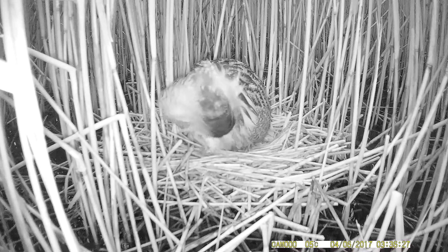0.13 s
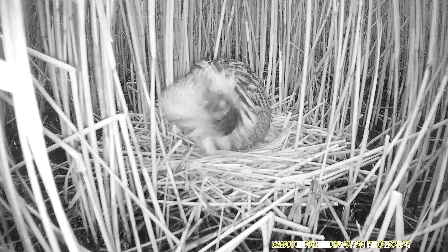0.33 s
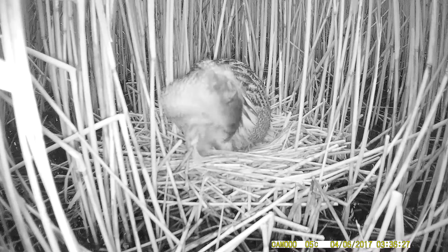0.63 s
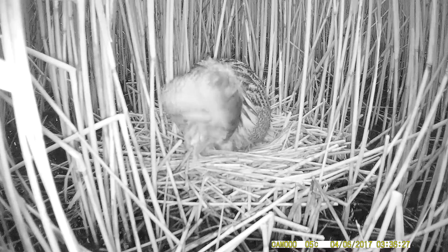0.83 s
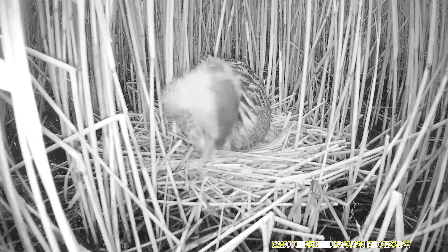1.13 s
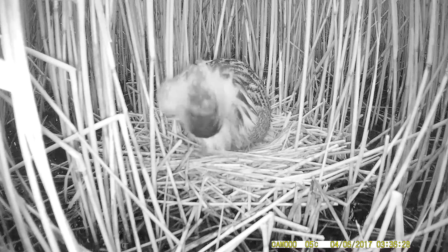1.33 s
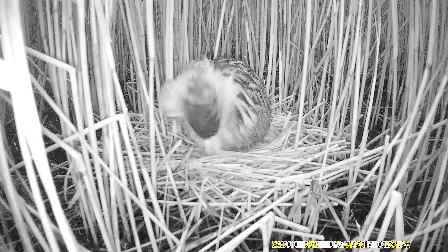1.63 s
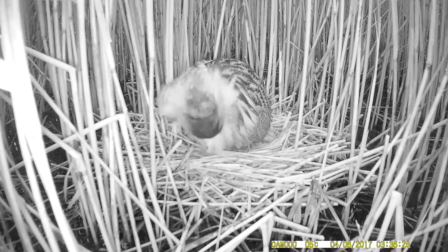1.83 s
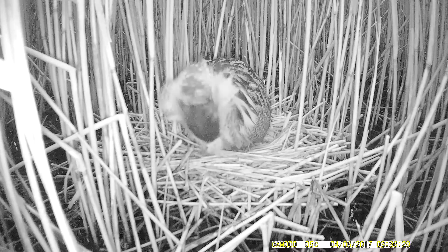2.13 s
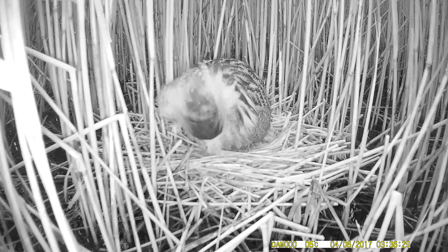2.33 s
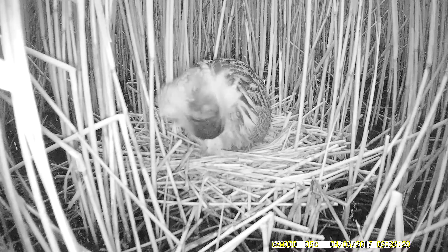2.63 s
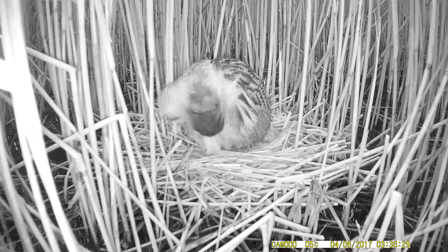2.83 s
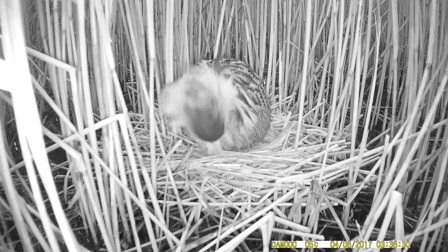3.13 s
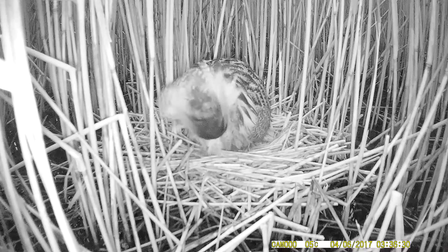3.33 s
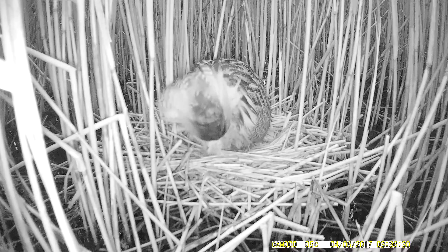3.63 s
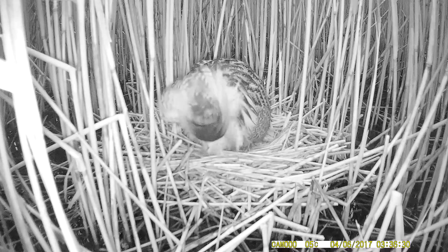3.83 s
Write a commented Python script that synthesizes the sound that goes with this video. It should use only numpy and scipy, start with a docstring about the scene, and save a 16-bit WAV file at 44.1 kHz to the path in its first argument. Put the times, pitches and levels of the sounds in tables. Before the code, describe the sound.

Close to the microphone among reeds, a small bird moves from clear whistles to rattles, two loud chips and rasping chatter with two squeals. Behind it are slight dry crackles, a far bird's thin notes and quiet hiss and rumble.

```python
"""Thin whistles come first, from a reed warbler close by in a reed bed; then two low rattles, two chips
and a run of harsh rasps, broken by two squeals. Every note is a harmonic tone from the syrinx, clean
or rough, shaped by throat and beak; the stems scatter it into a short tail. Behind it are a far bird's
thin slurs, a few rustles, a faint high buzz once a second, a low drone, and steady rumble and hiss."""
import sys
import numpy as np
from scipy import signal
from scipy.fft import rfft, irfft
from scipy.io import wavfile
from scipy.ndimage import map_coordinates

SR = 44100
rng = np.random.default_rng(int(sys.argv[2]) if len(sys.argv) > 2 else 0)


def unload_audio(sound):
    """Save the sound as a 16-bit wav file, at the path given as the first command line argument."""
    columns = np.transpose(np.atleast_2d(sound))
    # keep every value between -1 and 1, then stretch to whole-number steps
    steps = np.round(np.clip(columns, -1, 1) * 32767)
    wavfile.write(sys.argv[1], SR, steps.astype(np.int16))


N = 176400
TOP_HZ = 15600  # ceiling for the harmonics and the final low-pass


def undb(db):
    """Decibels to gain."""
    return 10 ** (np.asarray(db) / 20)


def unit(x):
    """Scale to rms 1."""
    return x / np.sqrt(np.mean(x ** 2) + 1e-20)


def clock(length):
    """Sample times of a note, in seconds."""
    return np.arange(max(int(length * SR), 32)) / SR


def add(out, start, x):
    """Mix x in at start seconds."""
    i = max(int(start * SR), 0)
    out[i:i + len(x)] += x[:max(N - i, 0)]


def gate(t, attack, release):
    """Fade in, hold and fade out; times in seconds."""
    return np.sin(np.pi / 2 * np.clip(np.minimum(t / attack, (t[-1] - t) / release), 0, 1))


def gain_at(hz, curve):
    """Gain read from an EQ curve of (f/Hz, level/dB) points."""
    f, db = np.array(curve).T
    return undb(np.interp(np.log(np.maximum(hz, 1)), np.log(f), db))


def colour(x, curve):
    """Filter by an EQ curve."""
    size = 2 * len(x)
    hz = np.arange(len(x) + 1) * SR / size
    return irfft(rfft(x, size) * gain_at(hz, curve))[:len(x)]


def noise_bed(curve):
    """Scene-long noise through an EQ curve, rms 1."""
    return unit(colour(rng.standard_normal(N), curve))


def wobble(size, hz):
    """Smooth random modulation up to about hz, spread near 1."""
    knots = rng.standard_normal(2048)
    return map_coordinates(knots, [np.arange(size) * 2 * hz / SR], order=3, mode="wrap")


# EQ of the two noise beds: f/Hz, level/dB
RUMBLE_EQ = [(15, -24), (25, -12.5), (81, 0), (124, -4), (184, -4.5), (288, -12), (565, -18), (900, -25.5),
             (1170, -49), (1980, -120)]
HISS_EQ = [(500, -25), (900, 3), (2000, 7.5), (4000, 12), (6000, -6), (10000, -26.5), (15000, -37.5)]
def background(rumble_db=-51, hiss_db=-57.5):
    """Distant rumble under an even hiss."""
    lowpass = signal.butter(4, 1000, fs=SR, output="sos")
    rumble = unit(signal.sosfilt(lowpass, noise_bed(RUMBLE_EQ)))
    return undb(rumble_db) * rumble + undb(hiss_db) * noise_bed(HISS_EQ)


# Drone bands near 94 and 175 Hz: f/Hz, level/dB
LOW_DRONE_EQ = [(60, -51), (80, 2.5), (94, 4.5), (108, -8.5), (135, -36)]
HIGH_DRONE_EQ = [(130, -20), (160, -8), (176, 2), (192, -2.5), (230, -31)]
# Their fader moves: t/s, low level/dB, high level/dB
DRONE_FADERS = [(0, -54.5, -66.5), (1.4, -54.5, -66.5), (2.1, -59, -58.5), (4, -96, -62.5)]
def drone():
    """A low, far drone whose weight passes from its lower to its upper band."""
    t = np.arange(N) / SR
    times, low_db, high_db = np.array(DRONE_FADERS).T
    low = undb(np.interp(t, times, low_db)) * noise_bed(LOW_DRONE_EQ)
    high = undb(np.interp(t, times, high_db)) * noise_bed(HIGH_DRONE_EQ)
    return low + high


# Buzz cues: t/s, length/s, level/dB
BUZZES = [(0.202, 0.22, -54.5), (1.206, 0.26, -55.5), (2.208, .2, -56.5), (3.209, 0.22, -56.5)]
# Thin, bright tick EQ: f/Hz, level/dB
BUZZ_EQ = [(3500, -36), (5000, 2), (5800, 2.5), (7500, -8), (9700, -9), (11000, -35)]
def buzz(ticks_per_s=87.4):
    """A faint train of high ticks, on for a moment each second."""
    out = np.zeros(N)
    for start, length, db in BUZZES:
        cycle = clock(length) * ticks_per_s % 1
        ticks = np.exp(-cycle / 0.32) * rng.standard_normal(len(cycle))
        add(out, start, undb(db) * unit(colour(ticks, BUZZ_EQ)))
    return out


# Reed snaps: t/s, pre-EQ level/dB
SNAPS = [(.51, -49), (.575, -50), (.80, -48.5), (1.0, -53), (1.058, -54), (2.256, -52)]
# Spells of rustling: t/s, length/s, pre-EQ level/dB
RUSTLES = [(0.477, 0.12, -60.5), (.74, 0.38, -63.5), (1.0, 0.22, -68)]
# Crisp EQ of dry reed: f/Hz, level/dB
REED_EQ = [(300, -4), (1000, 5), (5000, 10), (8000, -4.5), (12500, 4), (15500, -18)]
def rustles(snap_decay_s=0.0054, crackles_per_s=220):
    """Dry reed crackling at the nest, with a few louder snaps."""
    out = np.zeros(N)
    t = clock(.03)
    snap_envelope = gate(t, .001, .01) * np.exp(-t / snap_decay_s)
    for start, db in SNAPS:
        add(out, start, undb(db) * snap_envelope * rng.standard_normal(len(t)))
    for start, length, db in RUSTLES:
        t = clock(length)
        impulses = (rng.random(len(t)) < crackles_per_s / SR) * rng.standard_normal(len(t))
        grain = rng.standard_normal(len(clock(.002)))
        crackle = signal.fftconvolve(impulses, grain, "same")
        add(out, start, undb(db) * gate(t, .02, .04) * unit(crackle))
    return colour(out, REED_EQ)


# Far bird's slurs: t/s, length/s, first f/Hz, last f/Hz, level/dB
SLURS = [(0.976, 0.0862, 4270, 4400, -53), (1.808, 0.098, 6080, 5010, -57.5),
         (2.934, 0.12, 6500, 7160, -63.5), (3.056, 0.041, 5930, 5400, -54.5),
         (3.106, .07, 5030, 5170, -53.5), (3.198, 0.043, 4530, 4060, -49.5),
         (3.434, 0.025, 7070, 5900, -58), (3.677, 0.057, 4130, 3830, -55.5)]
def far_bird():
    """Thin, wavering sine slurs from further off."""
    out = np.zeros(N)
    for start, length, first, last, db in SLURS:
        t = clock(length)
        hz = np.linspace(first, last, len(t)) * (1 + 0.023 * wobble(len(t), hz=300))
        tone = np.sin(2 * np.pi * np.cumsum(hz) / SR)
        add(out, start, undb(db) * gate(t, 0.0067, 0.0087) * tone)
    return out


# Bright EQ of the stem echoes: f/Hz, level/dB
SCATTER_EQ = [(1000, -27.5), (2000, 4.5), (2800, 5), (4200, 6.5), (6000, 16.5), (12000, 22)]
def stem_scatter(x, echoes_per_s, t60, send_db):
    """Many small echoes from the reeds, dying away by 60 dB in t60 seconds."""
    t = clock(.6)
    echoes = rng.standard_normal(len(t)) * (rng.random(len(t)) < echoes_per_s / SR)
    echoes *= undb(-60 * t / t60) * (t > .002)  # 2 ms pre-delay
    response = colour(echoes / np.sqrt(np.sum(echoes ** 2) + 1e-20), SCATTER_EQ)
    return undb(send_db) * signal.fftconvolve(x, response)[:N]


def voice(hz, throat, rough, flutter, jitter_hz=700, flutter_hz=350):
    """Syrinx harmonics weighted by the throat, rms 1; rough shakes the pitch, flutter the level."""
    pitch = hz * (1 + rough * wobble(len(hz), jitter_hz))
    phase = 2 * np.pi * np.cumsum(pitch) / SR
    k = np.arange(1, 12)[:, None]
    harmonics = gain_at(k * hz, throat) * (k * hz < TOP_HZ) * np.sin(k * phase)
    return unit(harmonics.sum(0) * (1 + flutter * wobble(len(hz), flutter_hz)))


# Opening whistles: t/s, length/s, f/Hz, level/dB
WHISTLES = [(0.019, 0.046, 1318, -33), (0.1066, 0.13, 1300, -25.5), (0.361, 0.048, 1346, -34),
            (.447, .121, 1329, -26)]
# Throat EQ while whistling: f/Hz, level/dB
WHISTLE_THROAT = [(1300, -21.5), (2620, -11.5), (3300, 1), (3950, 3.5), (5250, -14), (6500, -37),
                  (7900, -50), (9200, -47.5), (10500, -44), (13000, -60), (15000, -58)]
def whistles(scoop=.17, scoop_s=.005, rise_hz_per_s=230, catch_at_s=0.1208):
    """Clean, wavering notes that scoop up to pitch and creep higher; long ones end in a rough catch."""
    out = np.zeros(N)
    for start, length, hz, db in WHISTLES:
        t = clock(length)
        pitch = hz * (1 - scoop * np.exp(-t / scoop_s)) + rise_hz_per_s * t
        rough = .0035 + .025 * np.exp(-((t - catch_at_s) / .007) ** 2)
        accent_db = 0.5 * np.exp(-t / 0.068)
        waver_db = 1.2 * wobble(len(t), hz=30)
        envelope = undb(db + accent_db + waver_db) * gate(t, 0.0018, 0.0077)
        add(out, start, envelope * voice(pitch, WHISTLE_THROAT, rough, flutter=.035))
    return out


# Rattle notes: t/s, length/s, second harmonic before the bend f/Hz, level/dB
RATTLES = [(0.716, 0.0079, 1934, -35.5), (0.739, 0.0057, 2170, -35), (0.752, 0.011, 1863, -29.5),
           (0.763, 0.0061, 2090, -27), (.776, .008, 2950, -35.5), (.788, .018, 2122, -26.5),
           (.810, 0.0063, 2940, -30), (.824, 0.017, 2093, -25), (.845, 0.0092, 2910, -29),
           (0.858, 0.018, 2135, -25), (0.879, 0.017, 2857, -27), (.896, 0.018, 2230, -30),
           (1.049, 0.007, 2090, -31.5), (1.074, 0.0043, 2840, -36), (1.086, 0.015, 2055, -26.5),
           (1.11, 0.0091, 2970, -33.5), (1.122, 0.017, 2097, -24.5), (1.146, 0.0096, 2900, -30),
           (1.161, 0.018, 2040, -23.5), (1.181, .011, 2830, -31.5), (1.196, 0.021, 2024, -24),
           (1.22, 0.022, 2800, -32.5)]
# Pitch bend in each note: share of its length, pitch ratio
RATTLE_BEND = [(0, 0.93), (.28, 0.88), (.48, 1.02), (1, 0.986)]
# Throat EQ while rattling: f/Hz, level/dB
RATTLE_THROAT = [(900, -41), (1150, -19), (1500, -21), (1750, 4), (2100, 5.5), (2420, -1.5), (2880, -3),
                 (3400, -1.5), (4200, -25), (5500, -41), (9000, -52.5), (14000, -56)]
def rattles(settle_s=0.0072):
    """Quick low notes that start rough and settle, alternating with higher, weaker ones."""
    out = np.zeros(N)
    for start, length, hz, db in RATTLES:
        t = clock(length)
        pitch = hz / 2 * np.interp(t / length, *np.array(RATTLE_BEND).T)
        rough = .022 + 0.062 * np.exp(-t / settle_s)
        note = voice(pitch, RATTLE_THROAT, rough, flutter=.18)
        add(out, start, undb(db) * gate(t, 0.0032, 0.0034) * note)
    return out


def glides(cues, gesture, throat, flutter):
    """One side of the syrinx sings the same gliding gesture at each cue."""
    out = np.zeros(N)
    times, *lanes = np.array(gesture).T
    t = clock(times[-1])
    hz, effort_db, rough = (np.interp(t, times, lane) for lane in lanes)
    for start, db in cues:
        envelope = undb(db + effort_db) * gate(t, 0.00062, 0.0016)
        add(out, start, envelope * voice(hz, throat, rough, flutter))
    return out


# Chip cues: t/s, level/dB
CHIPS = [(1.400, -15.5), (1.608, -15)]
# Gesture of each side of the syrinx: t/s from the cue, f/Hz, level/dB re the cue, roughness
CHIP_RISING = [(0, 1219, -43, .12), (.006, 1346, -4, 0.1), (.013, 1489, 1.5, 0.01), (.021, 1684, -5, 0.02),
               (0.028, 1830, -3, .02), (.037, 1790, -17, .04), (0.044, 1750, -57, .05)]
CHIP_FALLING = [(0, 1716, -40, 0.07), (.006, 1788, -11, .08), (.012, 1657, -26, 0),
                (0.025, 1513, -30, 0.11), (.032, 1470, -6.5, .03), (0.043, 1440, -17, 0)]
# Throat EQ in a chip: f/Hz, level/dB
CHIP_THROAT = [(1000, -5), (1400, -25.5), (2000, -8.5), (2400, -37), (2850, -11), (3400, 8.5), (4400, -4.5),
               (5000, -18), (5700, -33.5), (7000, -50), (8800, -47), (11000, -50), (15000, -71)]
def chips():
    """Sharp chips: the two sides of the syrinx cross in pitch."""
    rising = glides(CHIPS, CHIP_RISING, CHIP_THROAT, flutter=0.28)
    falling = glides(CHIPS, CHIP_FALLING, CHIP_THROAT, flutter=0.34)
    return rising + falling


# Squeal cues: t/s, level/dB
SQUEALS = [(3.224, -20.5), (3.456, -20.5)]
# Gesture of each side of the syrinx: t/s from the cue, f/Hz, level/dB re the cue, roughness
SQUEAL_HIGH = [(0, 1714, -23, 0.054), (0.011, 1590, -14.5, 0.034), (0.031, 1542, -5, .05),
               (0.036, 1711, 2.5, 0.0087), (0.042, 1980, -18, .03), (.050, 2142, 2, 0.021),
               (0.055, 1930, -28, .04)]
SQUEAL_LOW = [(0, 1388, -20.5, 0.028), (.024, 1292, -5.5, 0.035), (0.035, 1280, -18, 0.037),
              (0.048, 1501, -28, 0.038), (0.052, 1458, -1.5, 0.01), (.066, 1385, -6.5, .015),
              (.088, 1375, -7.5, 0.024), (0.103, 1340, -31, 0.014)]
# Throat EQ in a squeal: f/Hz, level/dB
SQUEAL_THROAT = [(1000, -17), (1400, -15.5), (2000, -16), (2400, -17), (2850, -5), (3400, 7), (4250, 4),
                 (5000, -4), (5700, -23), (7000, -36), (8800, -41), (11000, -40.5), (15000, -64)]
def squeals():
    """Both sides of the syrinx at once: a short high glide over a longer low one."""
    high = glides(SQUEALS, SQUEAL_HIGH, SQUEAL_THROAT, flutter=0.098)
    low = glides(SQUEALS, SQUEAL_LOW, SQUEAL_THROAT, flutter=0.097)
    return high + low


def ring(x, hz, t60):
    """A resonance with gain 1 at its centre."""
    radius = undb(-60 / (t60 * SR))
    pole = radius * np.exp(2j * np.pi * hz / SR)
    return 2 * (1 - radius) * signal.lfilter([1], [1, -pole], x).real


# Rasp notes: t/s, length/s, mean pitch f/Hz, level/dB
RASPS = [(1.85, 0.0094, 1624, -32.5), (1.878, 0.012, 1433, -23), (1.909, .016, 1489, -20),
         (1.929, 0.005, 1455, -23), (1.957, .019, 1489, -21), (2.051, 0.02, 1757, -38),
         (2.081, 0.013, 1517, -23.5), (2.110, 0.02, 1523, -20.5), (2.129, 0.0081, 1480, -24),
         (2.161, 0.019, 1492, -19.5), (2.264, 0.0099, 1645, -34), (2.293, 0.015, 1526, -20.5),
         (2.3224, 0.017, 1496, -21), (2.337, 0.0077, 1396, -23.5), (2.372, 0.021, 1521, -21),
         (2.494, 0.011, 1570, -36), (2.519, 0.018, 1528, -24), (2.5469, .017, 1479, -21),
         (2.563, 0.013, 1395, -23), (2.6005, 0.01974, 1494, -22), (2.737, 0.011, 1620, -37),
         (2.763, 0.015, 1573, -22.5), (2.791, .016, 1480, -20), (2.807, 0.0098, 1490, -24),
         (2.814, 0.0084, 1346, -26), (2.846, 0.012, 1511, -23.5), (2.942, 0.0062, 1640, -34),
         (2.966, 0.0078, 1530, -24), (2.993, 0.012, 1536, -20.5), (3.007, 0.019, 1312, -25.5),
         (3.026, 0.0084, 1424, -19.5), (3.055, .009, 1463, -22.5), (3.720, 0.0045, 1620, -28.5),
         (3.727, 0.0072, 1750, -30), (3.733, 0.014, 1596, -28), (3.749, 0.0099, 1464, -21.5),
         (3.762, 0.012, 1388, -25), (3.798, 0.013, 1475, -20.5), (3.815, 0.0096, 1412, -20),
         (3.830, 0.0095, 1387, -19), (3.837, 0.0054, 1395, -20), (3.864, 0.013, 1446, -26),
         (3.955, 0.0048, 1680, -30), (3.962, 0.0054, 1655, -22.5), (3.968, 0.014, 1523, -29.5),
         (3.983, .010, 1394, -21)]
# Throat EQ while rasping: f/Hz, level/dB
RASP_THROAT = [(900, -83), (1200, -14), (1500, -15.5), (1950, -0.5), (2400, -6.5), (2700, 7.5), (3300, 5.5),
               (3900, 3), (4450, -4), (5000, -15), (6500, -37.5), (9500, -35), (11500, -52.5), (15000, -60)]
# Formant shift from phrase to phrase: t/s, frequency ratio
THROAT_TUNING = [(1.85, 0.96), (2.8, 0.97), (3.0, 0.91), (3.75, 0.93), (4, 0.88)]
# Resonances that ring on after a rasp: f/Hz, t60/s, level/dB
RASP_RINGS = [(2720, .07, -6), (2925, .07, -6), (4410, .035, -6)]
def rasps(log_pitch_fall=0.277, sag_db=3.5):
    """Very short, rough notes that dive in pitch and weaken, shaped by the throat and ringing briefly."""
    out = np.zeros(N)
    flat_eq = [(1, 0)]
    for start, length, hz, db in RASPS:
        t = clock(length)
        progress = t / length
        pitch = hz * np.exp(log_pitch_fall * ((1 - progress) ** 2 - 1 / 3))
        source = voice(pitch, flat_eq, rough=0.096, flutter=0.54, jitter_hz=905.5, flutter_hz=582)
        tuning = np.interp(start, *np.array(THROAT_TUNING).T)
        throat = [(f * tuning, level) for f, level in RASP_THROAT]
        envelope = undb(db + sag_db * (.5 - progress)) * gate(t, 0.0036, 0.0043)
        add(out, start, envelope * unit(colour(source, throat)))
    return out + sum(undb(db) * ring(out, hz, t60) for hz, t60, db in RASP_RINGS)


def scene():
    """The quiet marsh, with both birds and their scatter on top, in mono."""
    marsh = background() + drone() + buzz() + rustles()
    song = far_bird() + whistles() + rattles() + chips() + squeals() + rasps()
    near_stems = stem_scatter(song, echoes_per_s=1700, t60=0.1, send_db=-13.5)
    far_stems = stem_scatter(song, echoes_per_s=5000, t60=0.25, send_db=-13)
    return (marsh + song + near_stems + far_stems)[None]


def record(dry):
    """A steep low-pass cuts the very top."""
    return signal.sosfilt(signal.ellip(10, .2, 80, TOP_HZ, fs=SR, output="sos"), dry)


dry = scene()
out = record(dry)
unload_audio(out)
```